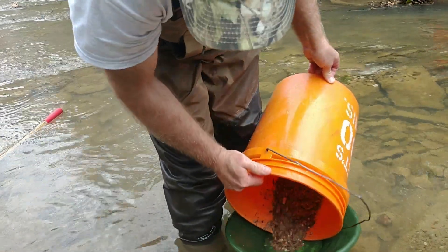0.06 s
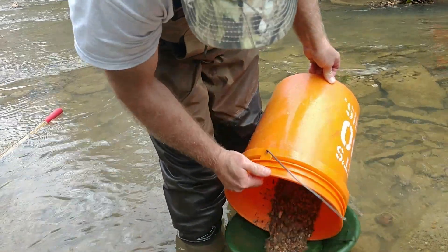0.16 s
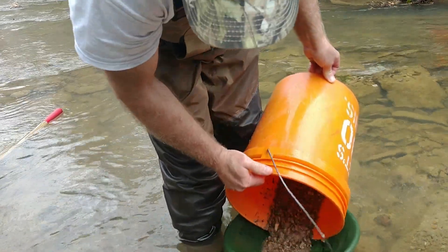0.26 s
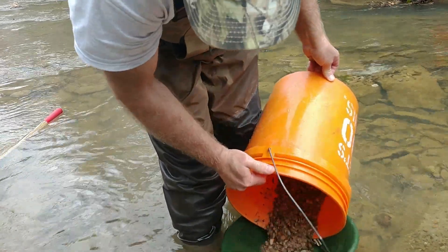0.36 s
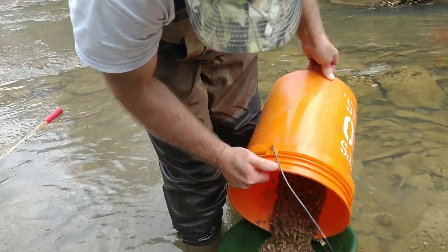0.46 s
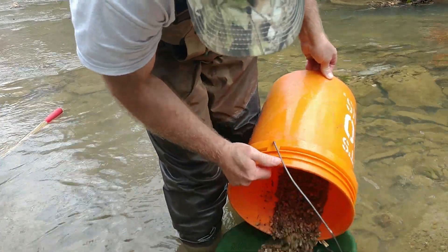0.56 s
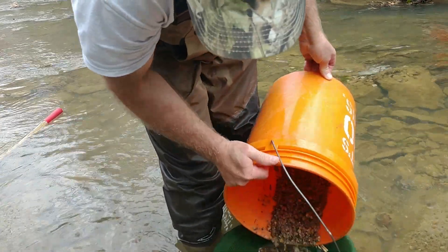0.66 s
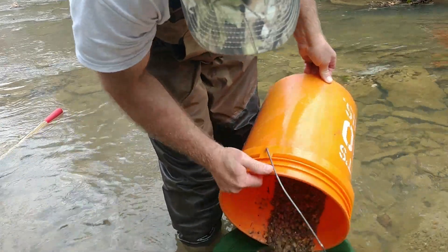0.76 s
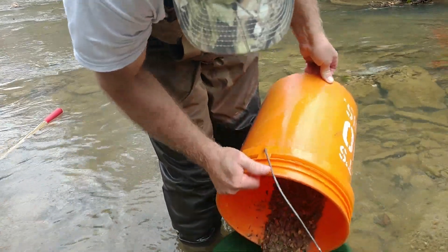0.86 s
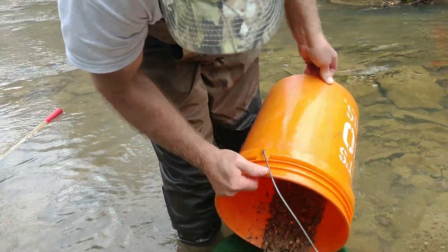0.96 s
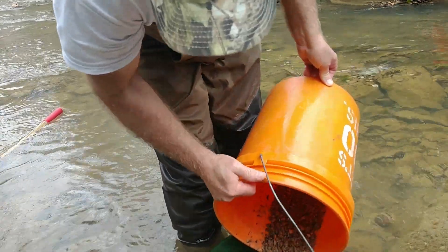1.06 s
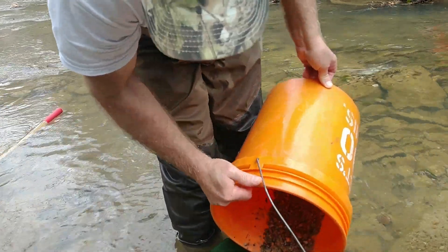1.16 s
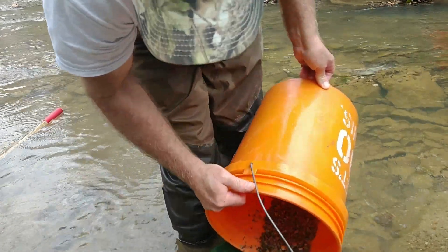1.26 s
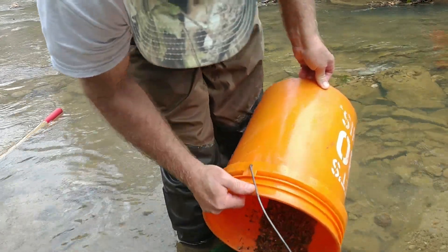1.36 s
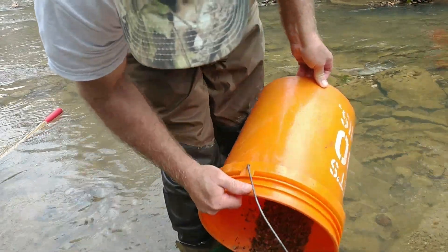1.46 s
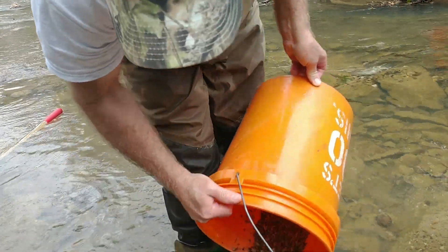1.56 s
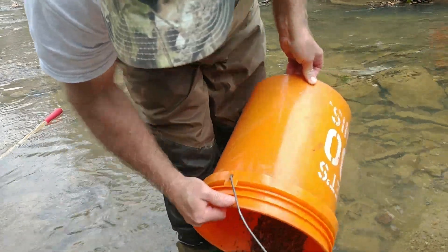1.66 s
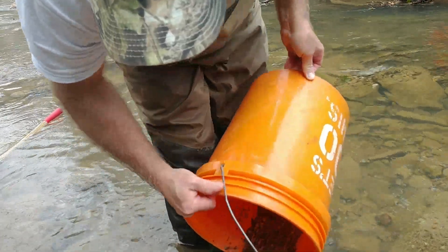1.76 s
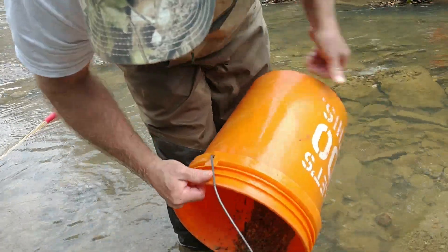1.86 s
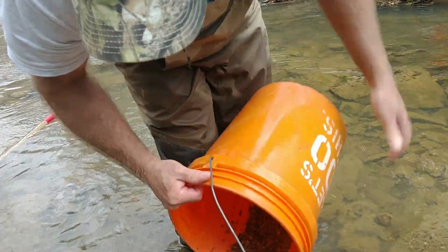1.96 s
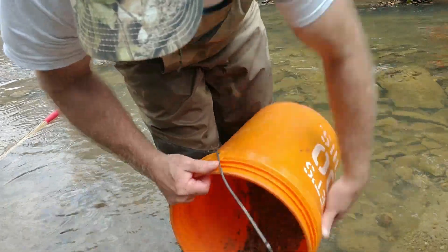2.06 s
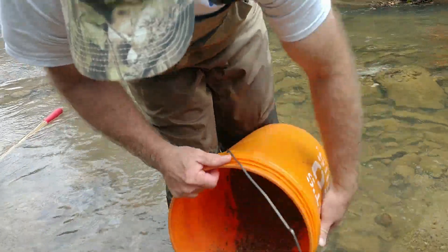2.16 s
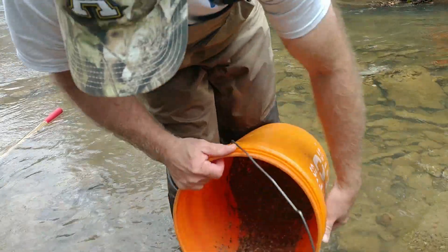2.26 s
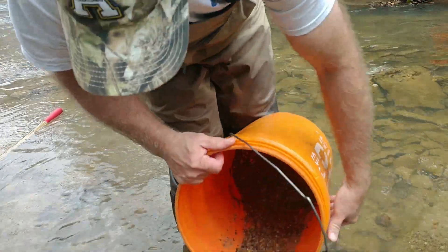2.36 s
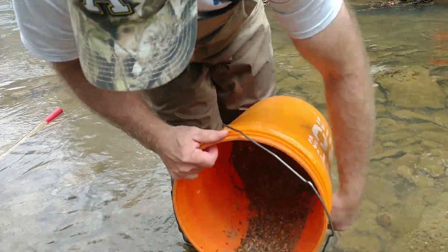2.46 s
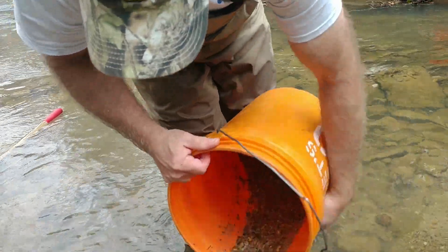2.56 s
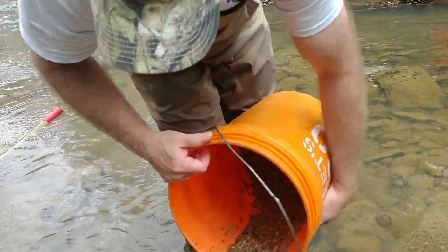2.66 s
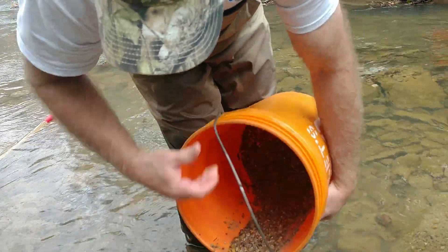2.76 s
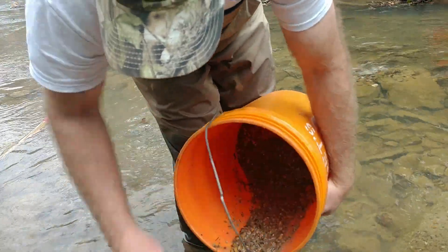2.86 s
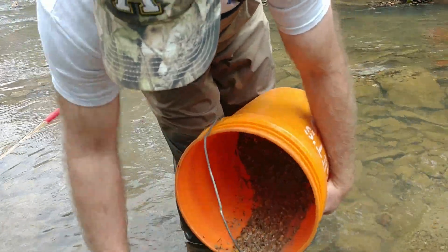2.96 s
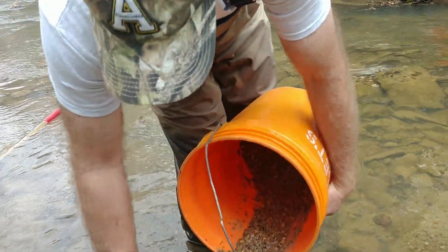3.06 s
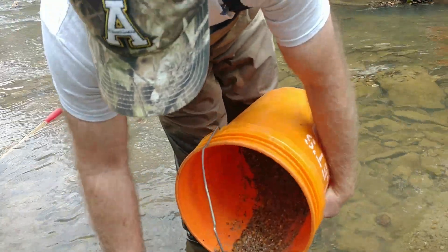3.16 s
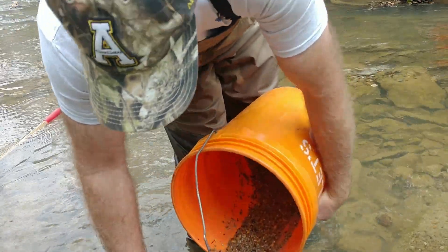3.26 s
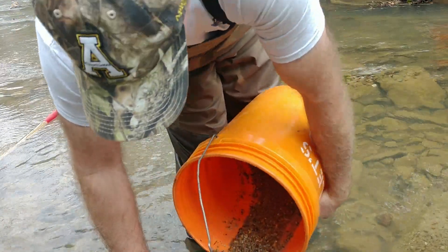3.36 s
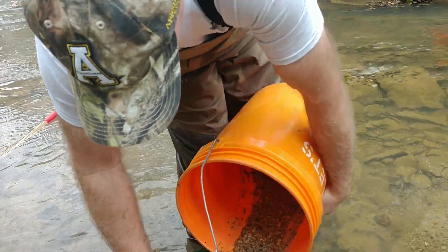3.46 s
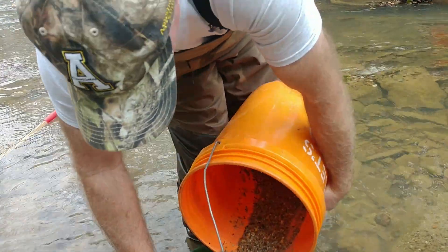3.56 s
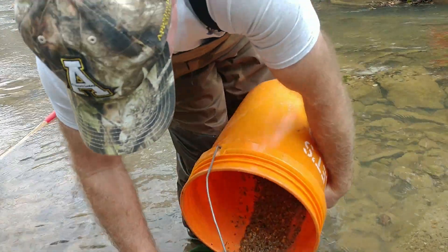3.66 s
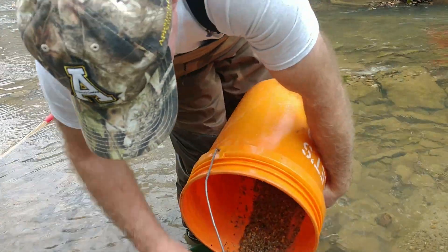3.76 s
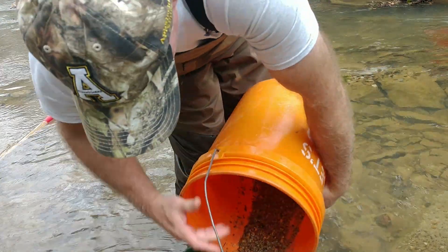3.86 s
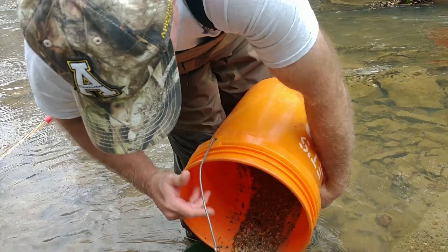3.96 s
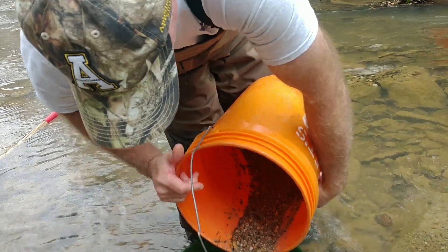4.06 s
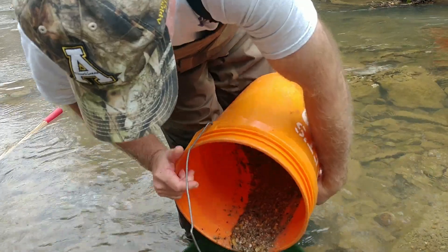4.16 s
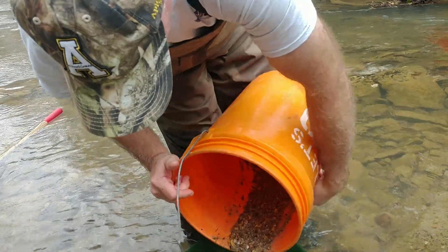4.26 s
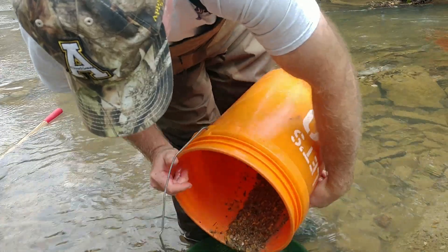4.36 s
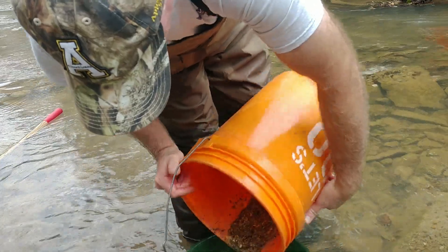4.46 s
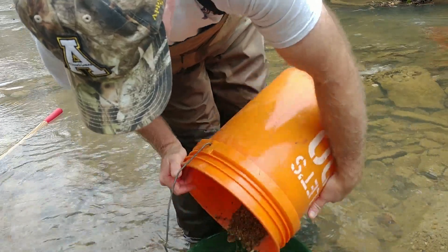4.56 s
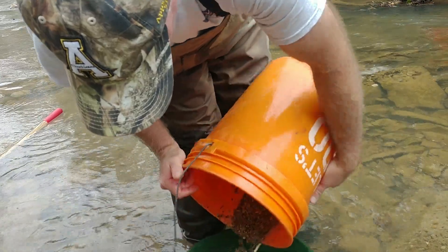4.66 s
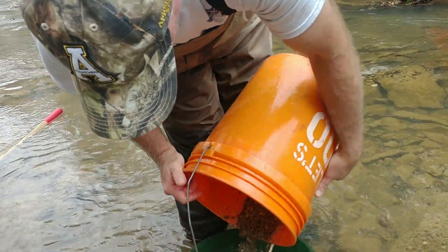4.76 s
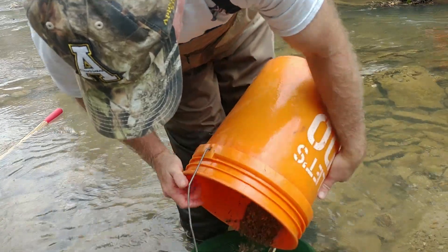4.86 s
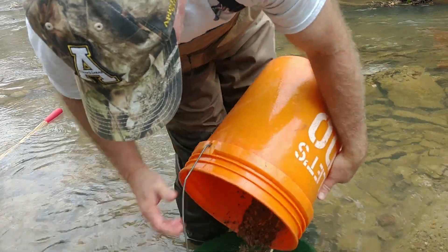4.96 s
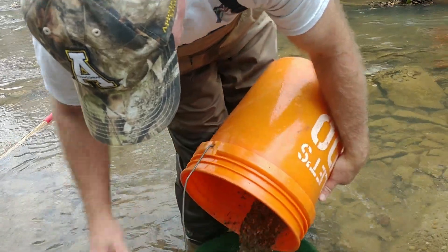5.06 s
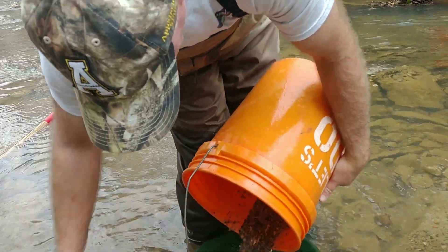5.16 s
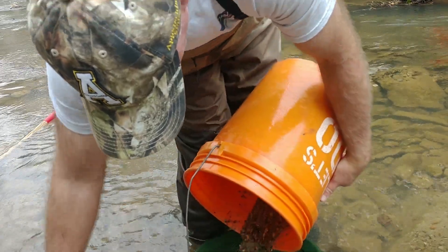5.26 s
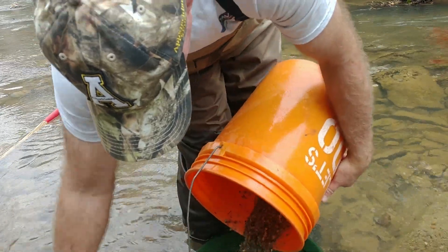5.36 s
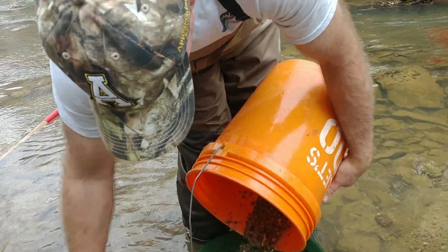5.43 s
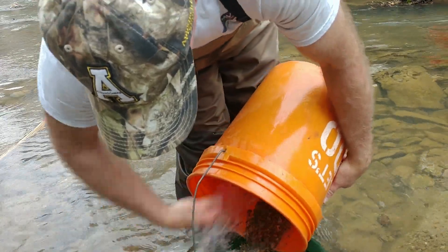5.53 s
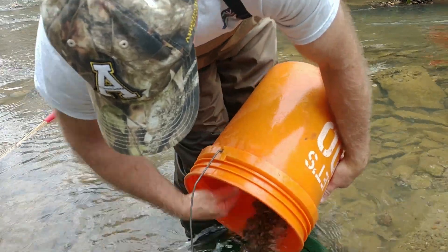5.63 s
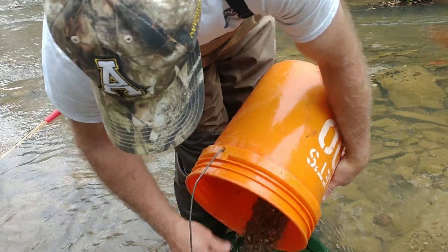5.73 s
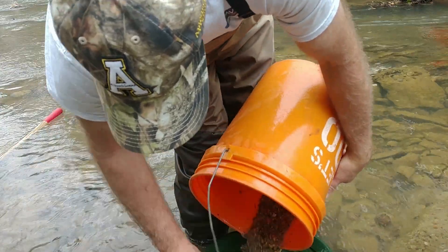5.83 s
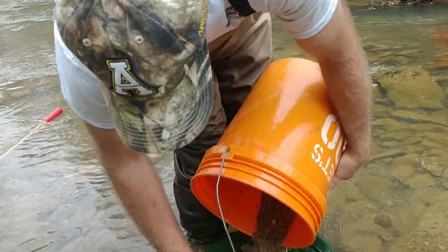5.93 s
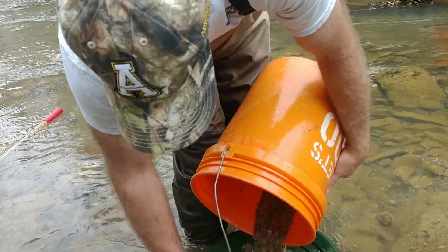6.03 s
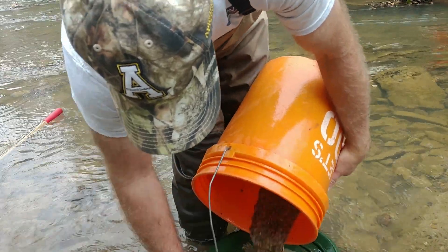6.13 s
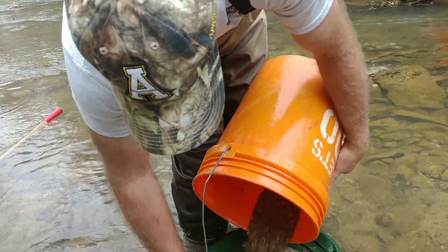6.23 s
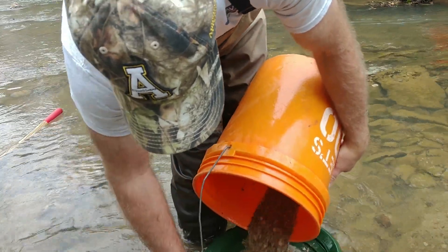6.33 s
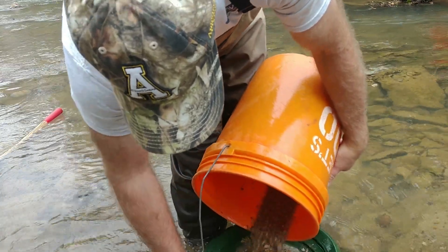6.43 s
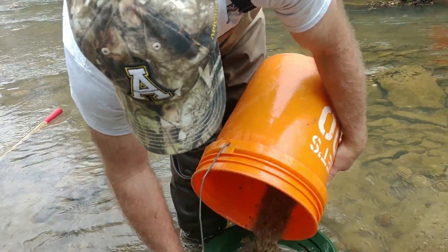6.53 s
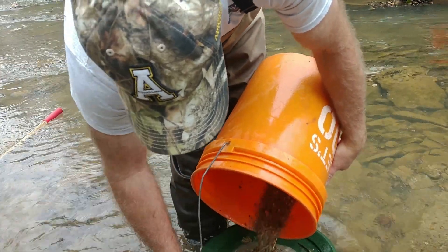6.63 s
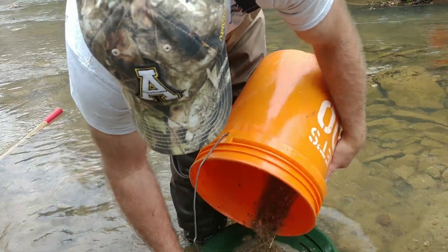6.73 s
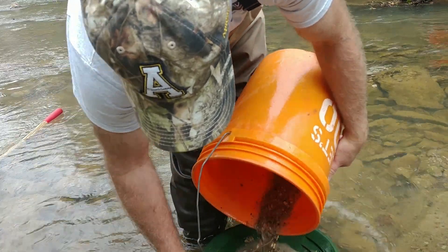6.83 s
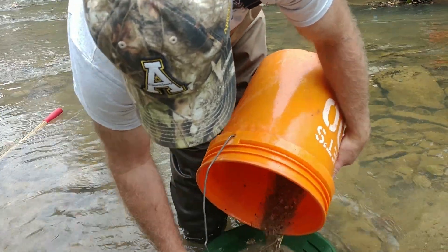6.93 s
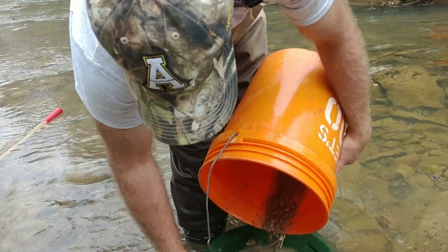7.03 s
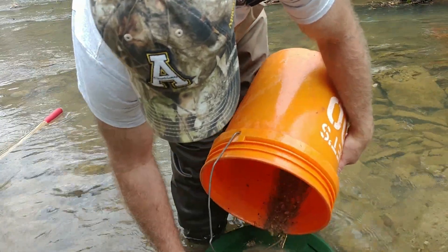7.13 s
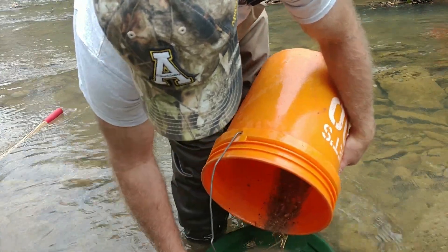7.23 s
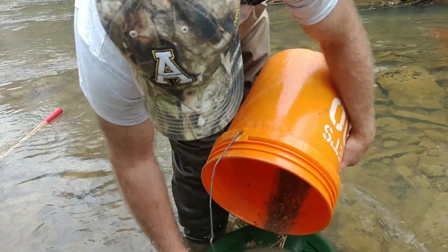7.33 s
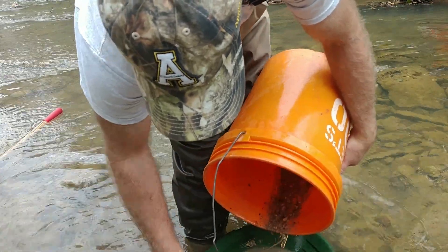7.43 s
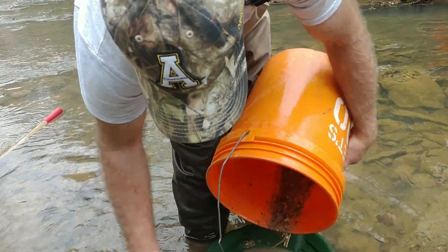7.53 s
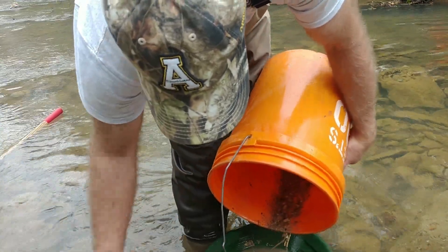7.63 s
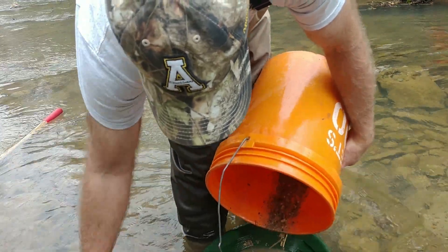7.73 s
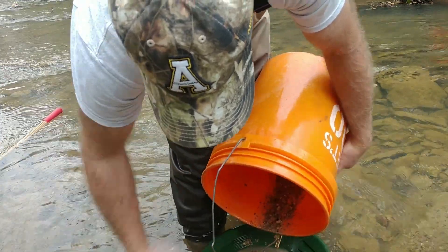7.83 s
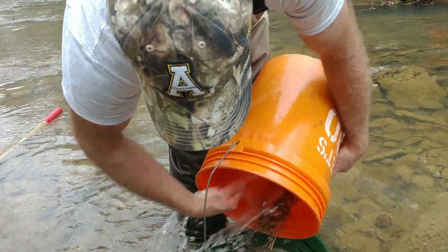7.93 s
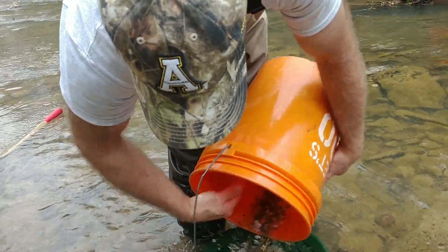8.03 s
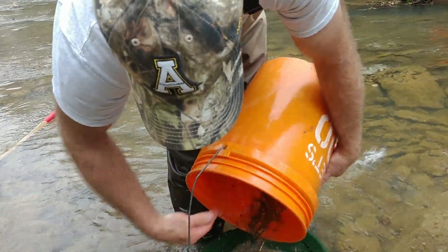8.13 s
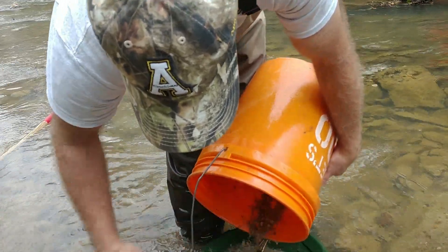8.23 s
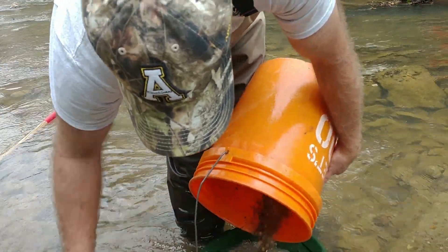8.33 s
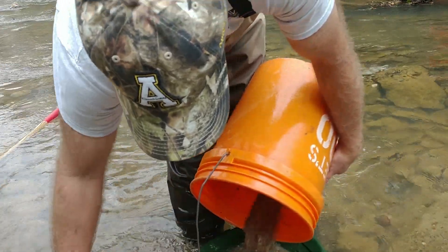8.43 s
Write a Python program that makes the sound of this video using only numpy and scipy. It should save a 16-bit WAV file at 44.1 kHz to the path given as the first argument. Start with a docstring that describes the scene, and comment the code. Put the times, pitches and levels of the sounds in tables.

```python
"""Hissing, ticking grit and slopping water: wet gravel slides out of a tilted plastic bucket into a pan.
A hand scoops water into the bucket. Many tiny impacts make the hiss, single stones click,
and pockets of air ring as gurgles and drips. The bucket hums under the sliding load and booms
when it is knocked. Behind it all a quiet creek murmurs."""
import sys
import numpy as np
from scipy import signal
from scipy.io import wavfile
from scipy.ndimage import uniform_filter1d

SR = 44100
rng = np.random.default_rng(int(sys.argv[2]) if len(sys.argv) > 2 else 0)


def dump(signal):
    """Clip the signal to [-1, 1] and save it as 16-bit WAV at the path in sys.argv[1]."""
    limited = np.clip(np.atleast_2d(signal).T, -1, 1)
    pcm = np.round(limited * 32767).astype(np.int16)
    wavfile.write(sys.argv[1], SR, pcm)


N = 374409
TIME = np.arange(N) / SR

# the steady slide of the load: t/s, grit/dB, water/dB, hum/dB, bucket wall against the air inside/dB
STEADY_SLIDE = [(0, -36, -42.5, -55.5, -8.5), (.3, -35, -40.5, -53.5, -20), (.6, -38, -46.5, -64, -7),
                (.78, -45, -61.5, -79, -5), (.95, -39.5, -51.5, -78, -1), (1.16, -37, -47.5, -75, -14),
                (1.51, -46.5, -55.5, -77, -15), (2.1, -35, -50.5, -69.5, -3),
                (2.4, -49, -56.5, -78.5, -2.5), (2.88, -47, -62, -68.5, -5), (3.17, -64.5, -83, -96, 9.5),
                (3.42, -78.5, -86, -99.5, -0.5), (3.8, -86, -86.5, -102.5, 15), (4.03, -65, -89, -99, -9),
                (4.21, -50, -75, -54.5, -13), (4.37, -43, -42, -64, -3), (4.63, -47.5, -60.5, -99, 9),
                (4.72, -58, -75.5, -84.5, -1), (4.92, -57, -53, -73, -4), (5.32, -36.5, -42.5, -75, 8),
                (5.48, -36, -37.5, -61, 7.5), (5.79, -31.5, -49, -70, -10), (6.03, -33, -39.5, -65.5, 18),
                (6.27, -37, -42.5, -56, 2), (6.46, -33, -41.5, -73, -10.5),
                (6.69, -41.5, -48.5, -102, 11.5), (6.95, -47, -54.5, -90, 7), (7.2, -58, -83, -100, 7),
                (7.4, -61, -94, -95, 3), (7.6, -74, -80, -96, 13), (7.84, -62.5, -87, -96.5, 7),
                (8.04, -59, -81, -79, -18), (8.16, -35, -35.5, -65, -2), (8.49, -32.5, -39.5, -53.5, 4)]
# tone colour of the water and of dull clacks: f/Hz, level/dB
WATER_COLOUR = [(290, -23), (500, -21), (637, -17.5), (804, 2), (1080, -2.5), (1580, 3.5), (2370, 1),
                (2590, 2.5), (3990, 0), (7000, 1), (9100, -37.5), (15400, -120)]


def sliding_load():
    """How strong grit, water and hum are over time: the steady slide plus surges, added as powers."""
    # a surge from each shake or scoop: peak t/s, length/s, grit/dB, water/dB, hum/dB
    surges = [(0.87, 0.079, -39.5, -43, -72), (1.011, 0.092, -43, -43, -86), (1.065, 0.092, -33, -69, -66),
              (1.15, 0.034, -48, -45, -61), (1.246, 0.079, -53, -44, -57),
              (1.395, 0.081, -39, -50.5, -57.5), (1.525, 0.19, -36.5, -47.5, -73),
              (1.66, 0.14, -34.5, -43.5, -62.5), (1.797, 0.24, -41.5, -43.5, -63.5),
              (2.222, 0.099, -34, -38.5, -40.5), (2.298, 0.11, -33.5, -41.5, -49.5),
              (2.353, 0.014, -30, -59, -73), (2.433, 0.013, -36, -49, -82), (2.513, 0.11, -37, -52, -61),
              (2.694, 0.14, -42, -53, -67), (2.746, 0.12, -59, -45, -57.5), (2.822, 0.093, -52, -47, -51),
              (2.97, 0.058, -50, -51.5, -52.5), (3.025, 0.12, -38, -56, -70), (3.271, 0.015, -55, -84, -99),
              (3.565, 0.044, -68, -95, -99), (3.679, 0.023, -65, -89, -99), (3.88, 0.078, -46.5, -58, -82),
              (4.087, 0.14, -56, -67, -73), (4.205, 0.086, -43, -44, -66), (4.327, 0.035, -39, -32, -52),
              (4.4, 0.075, -41, -44, -92), (4.543, 0.076, -40, -49, -85), (4.658, 0.013, -35.5, -67, -75),
              (4.766, 0.1, -41, -44, -48.5), (4.842, 0.12, -39, -45.5, -50), (4.902, 0.08, -37, -41.5, -74),
              (5.017, 0.15, -35, -39.5, -56.5), (5.283, 0.064, -47, -61, -65),
              (5.379, 0.15, -30.5, -33.5, -48.5), (5.577, 0.085, -51, -40, -48.5),
              (5.766, 0.13, -27.5, -41.5, -45), (5.909, 0.059, -31.5, -28, -40.5),
              (6.1, 0.16, -29.5, -36.5, -55.5), (6.475, 0.2, -36.5, -39.5, -55.5),
              (6.937, 0.037, -57, -43, -61), (7.013, 0.17, -45, -52, -80), (7.104, 0.14, -46.5, -75, -87),
              (7.46, 0.09, -60, -58, -101.5), (7.902, 0.066, -38.5, -42, -90),
              (7.952, 0.13, -35.5, -39, -65), (8.043, 0.1, -31.5, -40, -49.5),
              (8.161, 0.13, -25, -60, -48.5), (8.409, 0.086, -28.5, -39, -61)]
    rise, fall = 0.26, 0.47   # shares of the length in which a surge gains and loses 10 dB
    power = from_db(in_time(STEADY_SLIDE)[:3]) ** 2
    for s, length, *levels_db in surges:
        near = slice(max(round((s - .3) * SR), 0), round((s + .5) * SR))
        late = (TIME[near] - s) / length
        loss_db = 10 * np.maximum(-late / rise, late / fall) ** 1.41
        power[:, near] += from_db(np.array(levels_db)[:, None] - loss_db) ** 2
    return np.sqrt(power)


def grit_hiss(grit_gain):
    """Tiny impacts blur into a hiss: thick wet grit is fuller and duller, the last grains bright."""
    # tone colour of the grit: f/Hz, level/dB
    colour = [(1470, -50.5), (2500, -11.5), (6150, -7), (8910, 0), (11800, 3.5), (13500, 0.5),
              (15100, -0.5), (16000, -6), (16500, -27)]
    impacts = grains(per_s=400, spread_db=4.0, t60=0.0026, share=0.41)
    hiss = coloured_noise(grit_gain * impacts, colour, flicker_db=1.5)
    flow_db = 20 * np.log10(uniform_filter1d(grit_gain, size=2000))
    thickness_db = np.clip(flow_db + 40.5, -30, 15)   # against a middling flow
    body = filtered(hiss, 7100)
    rest = hiss - body
    top = rest - filtered(rest, 13200)
    return from_db(0.19 * thickness_db) * body + rest + (from_db(-0.038 * thickness_db) - 1) * top


def water_wash(water_gain):
    """Splashing noise, tinted by the bucket's hollow mouth and by the water lying inside."""
    # broad rings of the mouth: f/Hz, ring time/s, level against the water/dB
    mouth = [(1690, 0.003, -5), (3440, 0.0021, -7.5)]
    # narrow rings of the pool, which swell and fade: f/Hz, ring time/s, level against the water/dB
    pool = [(848, 0.051, 4.5), (946, 0.017, 1), (1366, 0.043, -1), (1590, 0.069, -9.5),
            (2380, 0.031, -14.5), (2675, 0.018, -10), (3090, 0.023, -14)]
    splashes = grains(per_s=230, spread_db=6.0, t60=0.018, share=0.45)
    water = coloured_noise(water_gain * splashes, WATER_COLOUR, flicker_db=2.0)
    out = water + sum(from_db(db) * resonance(water, hz, t60) for hz, t60, db in mouth)
    for hz, t60, db in pool:
        out += from_db(db + 4.0 * drift(2.5)) * resonance(water, hz, t60)
    return out


def onset_clicks():
    """The sharp click at the start of many pebble ticks and of some slops: one single click each."""
    # onset clicks: t/s, level/dB, lowest f/Hz, left minus right/dB
    cracks = [(0.7996, -20, 7924.0, -12), (0.9806, -29, 11541.0, -7.9), (0.9883, -18, 11025.0, -14),
              (1.217, -20, 8096.0, -16), (1.2904, -15, 9991.0, -10), (1.3014, -16, 10680.0, -9.6),
              (1.3276, -23, 11886.0, -8.9), (1.4306, -21, 8785.0, -4.5), (1.4566, -22, 10335.0, -7),
              (1.5129, -21, 11886.0, -15), (1.8898, -22, 9646.0, -3.9), (2.2076, 1.5, 1500, -4),
              (2.2254, -11, 7030, -3), (2.2447, -9, 11025.0, -9.5), (2.2984, -10.5, 10100, -7),
              (2.3509, -15, 8500, 7), (2.4038, -21, 8268.0, -9), (2.4195, -14, 8957.0, -6),
              (2.5032, -20, 12300, -12), (2.7638, -12, 9991.0, -14), (2.9737, -17, 10000, 0),
              (2.98, -14, 11197.0, -9), (2.9851, -15, 10080, -11), (2.993, -1.5, 8785.0, -15),
              (3.0305, -17, 8200, -5), (3.1497, -23, 11714.0, -9.0), (3.9033, -24, 11369.0, -17),
              (4.2667, -22, 2928.0, -5), (4.3604, -13, 10680.0, -8), (4.6554, -24, 11500, -1),
              (4.7514, -17, 7010, -14), (4.755, -14, 6510, -15), (4.7775, -16, 1800, -5),
              (4.803, -5, 5000, -13), (4.837, -5, 3000, -11), (4.8195, -8, 8050, -14),
              (4.8289, -8.6, 9474.0, -11), (4.8827, -20, 11025.0, -3), (5.011, -3, 10163.0, 3),
              (5.2685, -14, 11886.0, -10), (5.36, -12, 10550, -4.7), (5.6146, -17, 10680.0, -4),
              (5.027, -9, 1300, -1), (5.1418, -16, 1200, -2), (5.2112, -15, 1200, -3), (6.0795, -7, 900, 0),
              (5.765, -3, 1500, -5), (5.907, -16, 1500, -1), (6.1298, -4, 1800, -3),
              (6.0209, -11, 5340.0, -18), (6.1968, -12, 9302.0, -8), (6.687, -19, 10680.0, -8.9),
              (6.703, -16, 11197.0, -8.3), (6.7207, -19, 7062.0, -6), (6.853, -27, 11197.0, -10.1),
              (7.02, -16.5, 11714.0, -14), (7.1266, -23.8, 11541.0, -10.2), (7.2938, -9, 11900, -4),
              (7.868, -17, 10163.0, -15), (8.0218, -5, 9991.0, -9), (8.089, -12, 9474.0, -5.0)]
    top_hz = 15100
    out, click = np.zeros((2, N)), signal.unit_impulse(300)
    for s, db, low_hz, pan in cracks:
        band = [min(low_hz, .7 * top_hz), top_hz]
        pulse = filtered(filtered(click, band, "band"), band, "band")
        i = round(s * SR) - 5
        out[:, i:i + len(pulse)] += from_db([[db + pan / 2], [db - pan / 2]]) * pulse / abs(pulse).max()
    return out


def pebble_ticks():
    """Each pebble strikes with a bright snap, a faint tail and a duller clack."""
    # the loudest pebbles: t/s, snap level/dB, clack level/dB, lean to the left/dB
    hits = [(0.5033, -12, -50, -6), (0.79, -17.5, -59, -3), (0.838, -18, -54, -9), (0.9315, -13.5, -55, -7),
            (0.9857, -27, -49, -7), (1.0434, -30, -58, -9), (1.1665, -19.5, -54, -13),
            (1.257, -25, -54, -6), (1.288, -27, -51, 0), (1.2995, -21.5, -54, -6), (1.327, -29, -51, -7.0),
            (1.4286, -16, -61, -4), (1.509, -32, -47, -4), (2.1923, -39.5, -30.5, -4),
            (2.2052, -11.5, -22, -10), (2.246, -13.5, -40.5, -7.5), (2.2827, -18.5, -51, -17.5),
            (2.3174, -19, -40.5, -2.5), (2.35, -7, -33, 3), (2.402, -22, -54, 2), (2.419, -10.5, -32.5, -5),
            (2.504, -14, -40.5, -3), (2.762, -9.5, -44, 2), (2.972, -23, -53.5, -6.5),
            (2.9788, -16.5, -58.5, -1), (2.984, -20, -45, -1.5), (2.9923, -12.5, -34, 10.5),
            (3.0083, -20, -56, -2), (3.021, -18, -46, -9), (3.031, -9.5, -63.5, -2),
            (3.0494, -25, -40, 4.5), (3.107, -44, -53, 6), (3.148, -24, -63, -3), (3.243, -44, -80, -9),
            (3.269, -40, -72, -7), (3.3097, -38, -79, -10), (3.6756, -48, -82, -12),
            (3.8617, -42, -44.5, -5), (3.866, -15.5, -48, -4), (3.9012, -38, -78, -5),
            (3.9534, -37, -67, -5), (3.98, -29.5, -78, -6), (4.264, -35, -31, 8), (4.301, -20, -36, -3.5),
            (4.3133, -12.5, -29.5, 1), (4.336, -12, -31, 0), (4.3595, -16, -50, -3),
            (4.3863, -6, -29.5, -3), (4.4565, -11.5, -35.5, -1), (4.539, -12.5, -54, -5),
            (4.751, -10.5, -33, -1), (4.774, -25, -29, -10), (4.8, -6.5, -24.5, 1.5),
            (4.8179, -13, -27, -11), (4.827, -9, -41, 4), (4.837, -24, -38, 4), (4.8822, -19, -39, -2.5),
            (4.961, -20, -37.5, -4.0), (4.982, -12, -34, 2), (5.009, -3.5, -33, -3), (5.1974, -15, -41, -1),
            (5.268, -9, -56.5, -2), (5.3, -9, -36, -2.5), (5.3387, -14, -26, -0.5), (5.358, -9.5, -40, 5),
            (5.381, -5, -24, -4), (5.391, -7, -36, -2), (5.6154, -8.5, -35, -8), (5.7578, -1, -39, -7),
            (5.904, -27, -26.5, -2.5), (6.0183, -7, -24.5, -2), (6.0421, -4, -27, -5),
            (6.0613, -13, -25.5, 5), (6.195, -11.5, -45, -5), (6.261, -13, -56, -4), (6.3648, -16, -43, -9),
            (6.686, -31, -48, -24), (6.748, -14.5, -51, -5.0), (7.0156, -28, -41, -15),
            (7.125, -37, -58, -7.5), (7.239, -30.5, -76, -11), (7.3006, -32.5, -79, -14),
            (7.4004, -31.5, -75, -11), (7.72, -53, -85, -12), (7.742, -34.5, -86, -15),
            (7.763, -36, -77, -5), (7.782, -29, -82, -8), (7.815, -30.5, -84, -7.5), (7.842, -33, -82, -8),
            (7.867, -29, -64, -16), (7.891, -21, -47, -5), (7.963, -14, -29, -2), (8.0025, -13, -52, -3.5),
            (8.0234, -5.5, -55, -3), (8.085, -19, -37, -5), (8.1275, -6.5, -33.5, -4),
            (8.2767, -6, -44, -1), (8.317, -6, -29.5, -1), (8.372, -14, -48, -3)]
    # tone colour of a snap: f/Hz, level/dB
    snap_colour = [(2060, -58), (3500, -15.5), (6280, -5.5), (7380, -1), (11900, 9.5), (15300, 1.5),
                   (16500, -17)]
    rise_s, snap_t60 = 0.0018, 0.0039
    s, db, clack_db, pan = np.transpose(hits)
    shape = bursts(s, db - 6.0, snap_t60) + bursts(s, db - 18.5, 14 * snap_t60)
    soften = np.exp(-2 / (rise_s * SR))
    shape = signal.lfilter([1 - soften], [1, -soften], shape)
    left_db = np.interp(TIME, s, 0.69 * (pan + 4))
    clacks = coloured_noise(bursts(s, clack_db, t60=0.037), WATER_COLOUR, flicker_db=3.5)
    snaps = coloured_noise(shape, snap_colour, flicker_db=4.5)
    return filtered(snaps, 11900) * from_db([left_db, -left_db]) + clacks


def slops():
    """Each slop is a puff of noise around the pitch of the pocket it fills."""
    # slops of water and wet gravel: t/s, level/dB, f/Hz
    puffs = [(1.101, -27.5, 1780), (2.206, -12, 900), (2.347, -28, 1400), (2.818, -25, 1390),
             (2.979, -34, 1880), (3.846, -30, 1750), (3.868, -19, 950), (4.2, -24, 1650),
             (4.894, -29, 1350), (4.909, -22, 1400), (4.963, -23.5, 1700), (5.051, -34, 1300),
             (5.093, -26, 1500), (6.152, -12, 1420), (7.977, -25, 1540), (8.021, -23, 950),
             (4.264, -30, 2750), (4.301, -24.5, 1400), (4.369, -22, 1060), (4.774, -6.5, 2680),
             (4.828, -31, 3350), (5.027, -15.5, 1640), (5.138, -15, 1440), (5.21, -18, 1620),
             (5.342, -13, 1530), (5.38, -20, 1590), (5.421, -16, 1250), (5.546, -20, 1300),
             (5.763, -10, 1830), (5.903, -4.5, 2050), (6.022, -19, 1570), (6.078, -9, 1200),
             (6.085, -20, 560), (6.129, -16, 1590), (7.443, -32, 2020), (7.94, -18, 866),
             (8.146, -19, 3800), (8.177, -21, 3570), (8.279, -17, 3500), (8.4, -17.5, 1200)]
    rise_s, t60 = 0.0028, 0.04
    out, t = np.zeros((2, N)), np.arange(round(t60 * SR)) / SR
    for s, db, hz in puffs:
        i = round(s * SR)
        mid, side = unit_rms(ring(rng.standard_normal((2, len(t))), hz, 10 / hz))
        out[:, i:i + len(t)] += rise_and_fade(t, db - 10, rise_s, t60) * to_stereo(mid, side, hz)
    return out


def gurgles(water_gain):
    """Pockets of air between the stones ring briefly, at random pitches."""
    per_s, ring_cycles = 290, 180
    sizes = from_db(3.2 * np.minimum(rng.exponential(1, N), 4.5))
    kicks = sizes * (rng.random(N) < per_s / SR)
    pocket, out = rng.integers(0, 16, N), 0
    for k, hz in enumerate(np.geomspace(1000, 3600, num=16)):
        tone = ring(kicks * (pocket == k), hz, ring_cycles / hz)
        tone = ring(tone, hz, 2.3 / hz)   # softens the start
        out += to_stereo(tone, np.roll(tone, 30), hz) * (hz / 1500) ** 0.98
    return from_db(-6.5) * water_gain * unit_rms(out)


def gulps():
    """A hollow in the water sounds lower as the hand opens it, and higher as it closes."""
    # hollows: t/s, level/dB, first f/Hz, last f/Hz, glide time/s, fade time/s
    hollows = [(3.848, -43, 1900, 950, 0.03, 0.3), (5.615, -37, 1900, 2900, .03, .2),
               (7.868, -43, 1650, 650, 0.085, .3)]
    out = np.zeros((2, N))
    for s, db, first_hz, last_hz, glide, t60 in hollows:
        i, t = round(s * SR), np.arange(round(t60 * SR)) / SR
        hz = last_hz * (first_hz / last_hz) ** np.clip(1 - t / glide, 0, 1)
        phase = 2 * np.pi * np.cumsum(hz) / SR
        # a random wobble smears the tone into a narrow band of noise
        wobble = signal.lfilter([1], [1, -1.92, .96 ** 2], rng.standard_normal((4, 20000)))[:, -len(t):]
        mid, side = unit_rms(wobble[:2] * np.sin(phase) + wobble[2:] * np.cos(phase))
        out[:, i:i + len(t)] += rise_and_fade(t, db, 0.0036, t60) * to_stereo(mid, side, last_hz)
    return out


def opening_scoops(wet):
    """The lowest pitch of the wet sounds falls as a scoop or slosh opens out."""
    # lowest pitch of the water: t/s, f/Hz
    lowest_pitch = [(0, 638), (.5, 757), (.75, 900), (1.0, 950), (1.06, 566), (1.3, 840), (1.7, 713),
                    (2.08, 716), (2.2, 394), (2.4, 770), (3.84, 779), (3.85, 1670), (3.88, 840),
                    (4.72, 700), (4.8, 483), (5.0, 723), (5.6, 761), (5.87, 900), (5.92, 418), (6.25, 782),
                    (7.0, 860), (7.85, 850), (7.865, 1600), (7.915, 1170), (7.94, 564), (8.1, 880),
                    (8.125, 455), (8.17, 725), (8.3, 690), (8.49, 470)]
    return above_edge(wet, in_time(lowest_pitch)[0])


def filling_splash(wet):
    """The last splash starts thin and fills out downward."""
    # pitch below which the splash is still weak: t/s, f/Hz
    edge = [(8.132, 3100), (8.19, 2600), (8.26, 1700), (8.32, 800), (8.42, 400)]
    i, weak_gain = round(edge[0][0] * SR), from_db(-8)
    highs = above_edge(wet[:, i:], in_time(edge)[0][i:], signal.sosfiltfilt)
    splash = weak_gain * wet[:, i:] + (1 - weak_gain) * highs
    return np.concatenate([wet[:, :i], splash], axis=1)


def bucket(hum_gain):
    """Knocks ring all the bucket's natural tones; the sliding load keeps the low ones humming."""
    # knocks on the bucket: t/s, level/dB
    knocks = [(2.192, -23), (2.204, -13), (2.961, -48.5), (4.267, -38), (5.339, -37.5), (5.755, -32),
              (5.901, -21.5), (5.914, -29.5), (6.076, -33), (8.045, -53), (8.123, -22)]
    # tones of the wall and of the air inside: f/Hz, level/dB, ring time/s
    tones = [(177.2, -5, 0.037), (203, 2.5, 0.065), (373, -0.5, 0.021), (520, 4.5, 0.031),
             (600.8, -8.5, 0.15), (950, -12, 0.053), (1400, 4, .06), (1640, -8.5, .05), (2320, -11.5, .05)]
    wall_db = in_time(STEADY_SLIDE)[3]
    out = np.zeros((2, N))
    rubbing = rng.standard_normal((2, N))
    chance_db = rng.normal(0, 2.6, (len(knocks), len(tones)))
    for k, (hz, tone_db, t60) in enumerate(tones):
        clicks = np.zeros(N)
        softness = 1 + (hz / 900) ** 2   # a soft contact barely reaches the high tones
        for (s, db), extra_db in zip(knocks, chance_db[:, k]):
            clicks[round(s * SR)] = from_db(db + tone_db - 16 + extra_db) / softness
        boom = ring(clicks, hz, t60)
        out += to_stereo(boom, .5 * np.roll(boom, 30), hz)
        if hz < 600:
            mid, side = unit_rms(ring(ring(rubbing, hz, 0.68 * t60), hz, 0.6 * t60))
            hum_db = 2.7 * drift(22) if hz < 280 else wall_db + 7.1 * drift(2.4)
            out += hum_gain * from_db(hum_db - 11) * to_stereo(mid, side, hz)
    return out


def drips():
    """A bubble rings as a rough, dying tone that rises a little."""
    # drips and lone bubbles, and one low knock on the bucket at 2.615 s: t/s, level/dB, f/Hz, ring time/s,
    # pitch rise/(octaves per s)
    bubbles = [(2.534, -40, 1030, 0.14, 0.11), (3.27, -56.5, 2116, 0.045, 1.24),
               (6.927, -37, 1460, 0.071, 2.2), (7.441, -38.5, 1880, 0.032, 5.4),
               (7.624, -53, 2000, 0.069, 1.4), (7.675, -57.5, 4260, 0.046, 1.1),
               (7.721, -53, 4240, 0.021, 1.5), (7.752, -59, 690, 0.13, 0.1),
               (7.867, -43.5, 1640, 0.074, 0.1), (2.615, -52, 205, 0.2, .1), (2.35, -35, 1400, 0.044, 0.1),
               (2.2, -35.5, 1200, 0.043, 0.1)]
    out = np.zeros((2, N))
    for s, db, hz, t60, rise in bubbles:
        i, t = round(s * SR), np.arange(round(t60 * SR)) / SR
        phase = 2 * np.pi * np.cumsum(hz * 2 ** (rise * t)) / SR
        roughness = unit_rms(uniform_filter1d(rng.standard_normal(9000), size=60))[:len(t)]
        shape = rise_and_fade(t, db, 0.00074, t60) * (1 + 0.38 * roughness)
        out[:, i:i + len(t)] += shape * to_stereo(np.sin(phase), np.cos(phase), hz)
    return out


def rim_scraping():
    """Gravel rubs over the rim: a long rasp at the start, short scrapes later."""
    # rasp of dry gravel: t/s, level/dB
    rasp = [(0, -59), (.12, -49), (.45, -50.5), (.65, -55.5)]
    # scrapes of grit: t/s, level/dB, fade time/s
    scrapes = [(6.695, -50, .06), (6.751, -46, 0.22), (6.928, -41.5, 0.048), (6.985, -36, 0.055),
               (7.004, -44.5, 0.31), (7.195, -54, 0.25), (7.444, -44, 0.025)]
    rasping = (TIME < rasp[-1][0]) * from_db(in_time(rasp)[0] + 1.5 * drift(25))
    scraping = sum(bursts(np.array([s]), db, t60) for s, db, t60 in scrapes)
    return rasping * pitched_noise(hz=3170, t60=0.0038) + scraping * pitched_noise(hz=4180, t60=0.0037)


def trickle():
    """The last thin stream rings in a small hollow."""
    # strength of the stream: t/s, level/dB
    stream = [(6.6, -70), (6.76, -74), (6.9, -59.5), (7.0, -58), (7.1, -69), (7.2, -67.5), (7.34, -74.5),
              (7.41, -93)]
    running = (TIME > stream[0][0]) & (TIME < stream[-1][0])
    return running * from_db(in_time(stream)[0] + 3.3 * drift(8.4)) * pitched_noise(hz=1486, t60=0.019)


def handling_rumble():
    """Hands and handle send a lumpy low noise into the microphones."""
    # strength of the rumble: t/s, level/dB
    levels = [(0.0, -89), (1.11, -101), (1.23, -76), (1.44, -92), (2.05, -103), (2.22, -62), (2.27, -76),
              (3.99, -88), (4.82, -71.5), (5.41, -99), (5.6, -64.5), (5.82, -98.5), (5.91, -67), (6.1, -96),
              (7.61, -99), (8.49, -83)]
    mid, side = unit_rms(filtered(rng.standard_normal((2, N)), [48, 125], "band"))
    return from_db(in_time(levels)[0] + 3.3 * drift(8)) * to_stereo(mid, side, hz=60)


def creek(grit_gain):
    """The creek's soft murmur; the background falls away while the grit is loud."""
    # tone colour of the creek: f/Hz, level/dB
    colour = [(18, -47), (36, -30.5), (82, -11), (181, -16.5), (235, -10.5), (359, 6), (1210, 6.5),
              (1890, -17), (4180, -24.5), (4530, -29), (13400, -15.5), (15200, -9), (16500, -28)]
    grit_excess_db = np.maximum(20 * np.log10(grit_gain) + 60.5, 0)
    return coloured_noise(from_db(-84.5 - 0.63 * grit_excess_db), colour, flicker_db=0.5)


def from_db(db):
    return 10 ** (np.asarray(db) / 20)


def unit_rms(x):
    """Scale a signal to an average strength (rms) of 1."""
    return x / np.sqrt(np.mean(x ** 2) + 1e-20)


def in_time(rows):
    """Join timed rows with straight lines, one curve for each column after the time."""
    s, *columns = np.transpose(rows)
    return [np.interp(TIME, s, column) for column in columns]


def at_hz(points, hz):
    pitches, values = np.transpose(points)
    return np.interp(np.log(hz), np.log(pitches), values)


def drift(rate_hz):
    """A slow random wander, about 1 in size."""
    r = np.exp(-2 * np.pi * rate_hz * 40 / SR)   # one step every 40 samples
    slow = signal.lfilter([1], [1, -2 * r, r * r], rng.standard_normal(N // 40 + 2002))[2000:]
    return np.interp(np.arange(N) / 40, np.arange(len(slow)), unit_rms(slow))


def filtered(x, hz, kind="low", order=2):
    return signal.sosfilt(signal.butter(order, hz, kind, fs=SR, output="sos"), x)


def above_edge(x, edge_hz, apply=signal.sosfilt):
    """Keep what lies above a moving pitch, by fading between filters half an octave apart."""
    step = 2 * np.log2(np.clip(edge_hz, 400, 3200) / 400)
    cuts = [signal.cheby2(8, 50, 330 * 2 ** (k / 2), "high", fs=SR, output="sos") for k in range(7)]
    return sum(np.clip(1 - abs(step - k), 0, 1) * apply(cut, x) for k, cut in enumerate(cuts))


def ring(x, hz, t60):
    """Each click in x starts a tone that fades by 60 dB in t60 seconds."""
    r, w = from_db(-60 / (t60 * SR)), 2 * np.pi * hz / SR
    return signal.lfilter([0, np.sin(w)], [1, -2 * r * np.cos(w), r * r], x + 1e-18)


def resonance(x, hz, t60):
    """A ring scaled so that a steady tone at its pitch keeps its level."""
    return 2 * np.log(1000) / (t60 * SR) * ring(x, hz, t60)


def pitched_noise(hz, t60):
    """Stereo noise sent twice through the same ring."""
    mid, side = unit_rms(ring(ring(rng.standard_normal((2, N)), hz, t60), hz, t60))
    return to_stereo(mid, side, hz)


def coloured_noise(envelope, colour, flicker_db):
    """Noise that follows a loudness curve, in bands of pitch that each flicker on their own."""
    edges = np.sort(np.append(30 * 2 ** np.arange(0, 9.4, .5), [9100, 12900]))
    white = rng.standard_normal((2, 2, N)) * envelope
    out, power = 0, 0
    for k, (low, high) in enumerate(zip(edges, edges[1:])):
        hz = np.sqrt(low * high)
        if colour[0][0] / 1.2 < hz < colour[-1][0] * 1.2:
            mid, side = filtered(white[k % 2], [low, high], "band")
            gain = from_db(at_hz(colour, hz))
            out += gain * from_db(flicker_db * drift(19)) * to_stereo(mid, side, hz)
            power += gain ** 2 * (high - low) / SR * 2
    return out / np.sqrt(power)


def rise_and_fade(t, db, rise_s, t60):
    return from_db(db - 60 * t / t60) * (1 - np.exp(-t / rise_s))


def die_away(kicks, t60):
    return signal.lfilter([1], [1, -from_db(-60 / (t60 * SR))], kicks + 1e-18)


def grains(per_s, spread_db, t60, share):
    """Loudness curve of a stream: a steady part plus many small impacts that come in clumps."""
    hits = rng.random(N) < per_s * from_db(5 * drift(9)) / SR
    sizes = hits * from_db(spread_db * np.minimum(rng.exponential(1, N), 3.2))
    return unit_rms(1 + share * unit_rms(die_away(sizes, t60)))


def bursts(s, db, t60):
    """A loudness curve that jumps at the times s and dies away."""
    starts = np.zeros(N)
    np.add.at(starts, np.round(s * SR).astype(int), from_db(db))
    return die_away(starts, t60)


def to_stereo(mid, side, hz):
    """Make left and right from a shared part (mid) and an opposite part (side)."""
    # how alike the two microphones sound: f/Hz, likeness from 0 to 1
    likeness = [(60, 0.23), (130, 0.54), (290, .82), (640, 0.42), (1410, 0.45), (3100, 0.055), (6800, 0.19),
                (15000, 0.15)]
    # which side is louder: f/Hz, left minus right/dB
    balance = [(60, -7.5), (110, 2), (200, -2), (380, -1), (700, 0.5), (1290, -3.5), (2380, -3.5),
               (4400, -5), (8120, 1), (15000, -11.5)]
    alike, left_db = at_hz(likeness, hz), at_hz(balance, hz) / 2
    pair = np.sqrt(1 + alike) * mid + np.sqrt(1 - alike) * side * [[1], [-1]]
    return from_db([[left_db], [-left_db]]) * pair


def scene():
    """Everything at the water's edge; the microphones thin out the bass of the pour and the bucket."""
    grit_gain, water_gain, hum_gain = sliding_load()
    wet = grit_hiss(grit_gain) + water_wash(water_gain) + onset_clicks() + pebble_ticks()
    wet += slops() + gurgles(water_gain) + gulps()
    pour = filling_splash(opening_scoops(wet)) + drips() + rim_scraping() + trickle()
    nearby = filtered(pour + bucket(hum_gain), 184, "high", order=5)
    return nearby + creek(grit_gain) + handling_rumble()


def record(dry):
    """The left side hears a little late, the biggest peaks are rounded and the highest treble is cut."""
    lag_samples, ceiling, top_hz = 3, 0.8, 15750
    pair = np.array([np.roll(dry[0], lag_samples), dry[1]])   # the bucket is nearer the right side
    rounded = ceiling * np.tanh(pair / ceiling)
    return signal.sosfilt(signal.ellip(10, .5, 55, top_hz, fs=SR, output="sos"), rounded)


dry = scene()
out = record(dry)
dump(out)
```